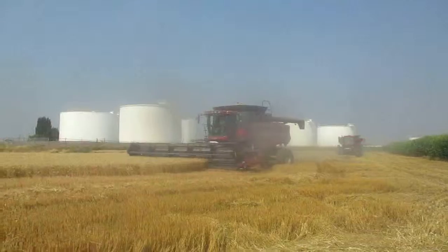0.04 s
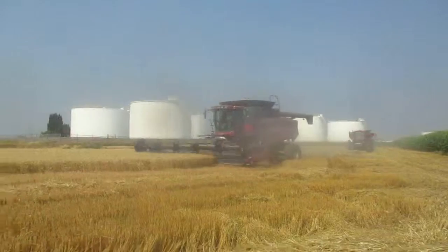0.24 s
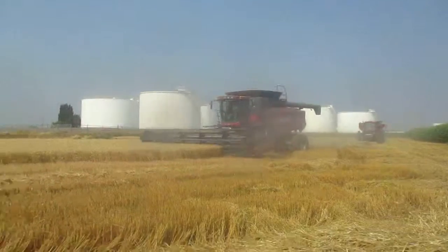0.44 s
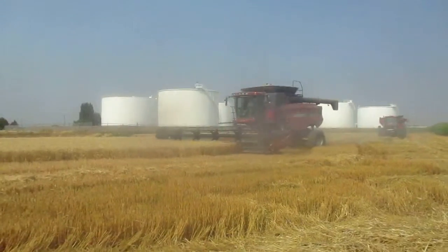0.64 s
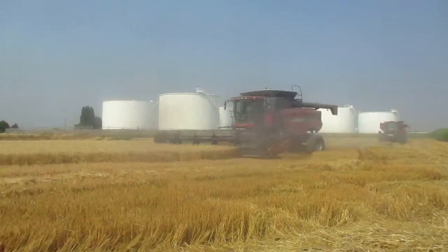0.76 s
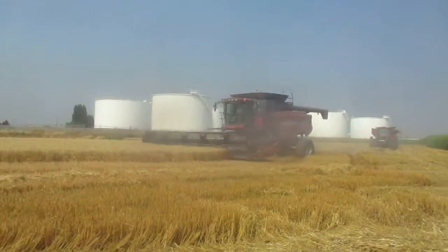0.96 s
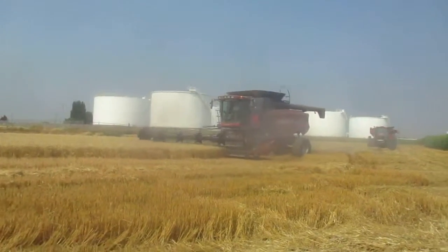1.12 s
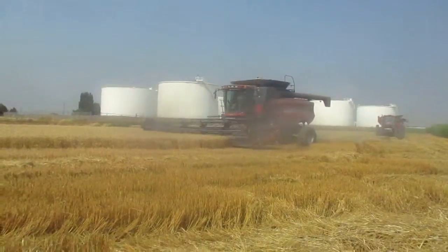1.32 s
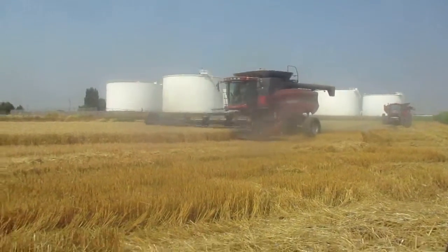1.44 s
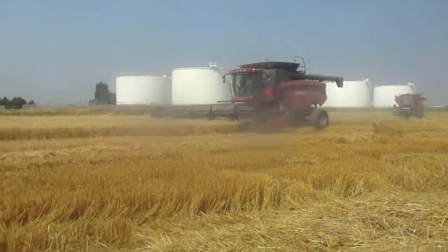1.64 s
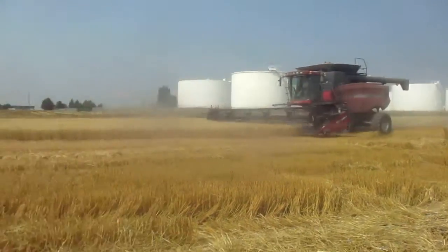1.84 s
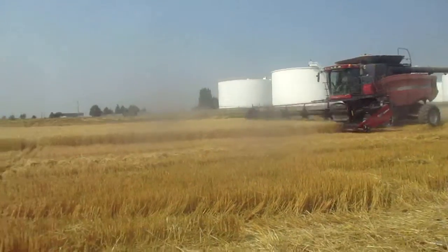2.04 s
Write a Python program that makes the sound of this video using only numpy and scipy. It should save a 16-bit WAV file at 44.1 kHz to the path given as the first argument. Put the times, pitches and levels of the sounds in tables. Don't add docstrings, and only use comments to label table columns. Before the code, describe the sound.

After 0.2 s of silence, a combine harvester's roar cuts in abruptly: low uneven diesel drone, broad threshing rush and faint wavering gear whine. Dry straw rustles close by until about 0.55 s, with sparse ticks and soft chain knocks later. Wind thumps near 0.77 s and 1.3 s, then buffets heavily from 1.6 to 1.9 s as the machine dips and changes tone, swelling again by 2.08 s.

```python
import sys
import numpy as np
from scipy import signal
from scipy.io import wavfile
from scipy.ndimage import uniform_filter1d, map_coordinates

SR = 44100
rng = np.random.default_rng(int(sys.argv[2]) if len(sys.argv) > 2 else 0)


def ratio_of_db(decibels):
    return 10 ** (np.asarray(decibels, float) / 20)


def store_wav(level_fs):
    pcm = np.round(np.clip(np.atleast_2d(level_fs), -1, 1) * 32767)
    wavfile.write(sys.argv[1], SR, pcm.T.astype(np.int16))


N = 91772
t = np.arange(N) / SR

# centre in Hz, width in Hz, level in dB.
EXHAUST_MODES = [(106.1, 25, -8), (207, 50, -30), (496, 180, -23.5), (720, 270, -23)]
# frequency in Hz, density in dB per Hz.
ROAR_SPECTRUM = [(30, -18.5), (100, 1.5), (400, -9), (750, -11.5), (1500, -19), (4000, -22.5),
                 (9000, -37.5), (15500, -108)]
# centre in Hz, width in Hz, level in dB.
HOUSING_MODES = [(714, 470, 10.5), (2010, 280, -2)]
# frequency in Hz, rms level in dB, share of roughness in dB.
GEAR_WHINES = [(2021, -36.5, -4), (2165, -46, -2), (867, -40, 0), (523, -42, 1), (1732, -52, 0),
               (2595, -56, 0), (4038, -59, 0)]
# time in seconds, whine level in dB.
GEAR_LOAD = [(.2, -7), (.3, 4), (.54, -14.5), (.6, 5.5), (.73, -0.5), (.87, 2), (1.2, -0.5), (1.7, 1.5),
             (1.78, -2), (2.08, -2.5)]
# time in seconds, level in dB.
MACHINE_LEVEL = [(.2, -26.5), (.32, -26), (.36, -21), (.74, -21), (.9, -21.5), (1.25, -20), (1.3, -19.5),
                 (1.73, -20.5), (1.78, -24.5), (1.9, -26.5), (2.0, -26), (2.08, -21)]
# time in seconds, level in dB.
GUSTS = [(.2, -29), (.3, -27), (.78, -20.5), (.82, -26.5), (1.25, -25.5), (1.6, -21.5), (1.8, -17.5),
         (1.88, -22), (1.89, -28), (1.96, -27), (1.98, -28), (2.0, -25), (2.05, -24.5), (2.08, -24)]
# time in seconds, peak in dB, frequency in Hz.
THUMPS = [(.298, -8, 130), (.761, -10, 80), (.77, -3, 100), (.781, -4, 110), (.848, -6, 155),
          (1.028, -10, 160), (1.302, -11, 200), (1.351, -11, 150), (1.375, -11, 190), (1.587, -10, 120),
          (1.606, -6, 150), (1.629, -7, 200), (1.696, -8, 260), (1.708, -10, 140), (1.731, -1, 233),
          (1.751, -1, 262), (1.77, -8, 227), (1.781, -4, 153), (1.791, -3, 195), (1.849, -11, 180),
          (1.859, -10, 230), (1.867, -5, 181), (1.877, -3, 232), (1.93, -7, 187), (1.972, -11, 260),
          (1.981, -4, 200), (1.991, -11, 223), (2.059, -11, 300), (2.065, -7, 290), (2.077, -11, 254)]
# time in seconds, level in dB.
RUSTLE_LEVEL = [(.2, -43.5), (.34, -38.5), (.5, -37), (.535, -46), (.56, -65), (.9, -48), (1.0, -96.5)]
# centre in Hz, width in Hz, level in dB.
STALK_MODES = [(8700, 2500, -5), (10600, 900, 0), (13300, 1500, -4)]
# time in seconds, peak in dB, length in ms.
STRAW_TICKS = [
    (.317, -42, 8),
    (.403, -36, 18),
    (.497, -38, 16),
    (.52, -41, 10),
    (.667, -33, 12),
    (.985, -49, 8),
    (1.518, -45, 2),
    (1.532, -34, 2.5),
    (1.685, -48, 6),
    (2.021, -43, 3),
]
# time in seconds, peak in dB, centre in Hz, length in ms.
KNOCKS = [
    (.398, -13, 3300, 12),
    (.52, -11, 4300, 10),
    (.667, -10, 3400, 12),
    (.985, -17, 3300, 10),
    (1.14, -14, 5000, 8),
    (1.607, -9, 2900, 9),
    (1.69, -18, 4000, 8),
]
# time in seconds, height in m, ground reflection factor.
MIC_HEIGHT = [(.2, 1.62, .6), (.75, 1.55, .6), (1.3, 1.45, .6), (1.72, 1.4, .6), (1.77, .93, -.65),
              (1.88, .78, -.65), (1.95, .55, -.75), (2.0, .39, -.85), (2.08, .27, -.85)]


def level(x, db):
    return x * ratio_of_db(db) / np.sqrt(np.mean(x ** 2))


def curve(rows, column=1):
    rows = np.array(rows, float)
    return np.interp(t, rows[:, 0], rows[:, column])


def noise():
    return rng.standard_normal(N)


def band(x, hz, width):
    return signal.lfilter(*signal.iirpeak(hz, hz / width, fs=SR), x)


def body(x, modes):
    out = 0
    for k, (hz, width, db) in enumerate(modes):
        out = out + (-1) ** k * ratio_of_db(db) * level(band(x, hz, width), 0)
    return out


def walk(rate):
    hold = int(SR / rate)
    steps = np.repeat(rng.standard_normal(N // hold + 1), hold)
    drift = uniform_filter1d(uniform_filter1d(steps, hold), hold)[:N]
    return (drift - drift.mean()) / drift.std()


def bump(s, ms):
    return np.exp(-((t - s) / (ms / 2000)) ** 2)


def diesel():
    firing_hz = 103.8 * (1 + 0.0049 * walk(7.6))
    count = np.floor(np.cumsum(firing_hz) / SR).astype(int)
    strength = ratio_of_db(2.0 * rng.standard_normal(400))
    pulses = np.diff(count, prepend=0) * strength[count]
    return level(body(pulses, EXHAUST_MODES), -19)


def threshing():
    roar_hz, roar_db = np.array(ROAR_SPECTRUM).T
    shared = walk(9.56)
    knife = np.sin(2 * np.pi * 7.2 * t + 1.2 * walk(2))
    roar = 0
    for hz in 35 * 2 ** np.arange(0, 9, .5):
        db = np.interp(np.log(hz), np.log(roar_hz), roar_db) + 10 * np.log10(hz)
        db = db + 0.24 * shared + 1.0 * walk(13.68)
        db = db + 1 * min(hz / 3000, 1) * knife
        hiss = band(band(noise(), hz, hz * 0.51), hz, hz * 0.51)
        roar = roar + ratio_of_db(db) * level(hiss, 0)
    housing = level(body(noise(), HOUSING_MODES), -26.5) * ratio_of_db(1.04 * walk(8.5))
    return level(roar, -22) + housing


def gears():
    out = 0
    for hz, db, rough_db in GEAR_WHINES:
        turns = np.cumsum(hz * (1 + 0.001536 * walk(5))) / SR
        tone = np.sqrt(2) * ratio_of_db(2.7 * walk(24.68)) * np.sin(2 * np.pi * turns)
        rough = level(band(band(noise(), hz, hz * 0.021), hz, hz * .05), rough_db)
        out = out + ratio_of_db(db) * (tone + rough)
    return out * ratio_of_db(curve(GEAR_LOAD))


def wind():
    wind_hz, width_hz = 227, 164
    flutter = band(band(noise(), wind_hz, width_hz), wind_hz, 2 * width_hz)
    flutter = level(flutter * ratio_of_db(1.5 * walk(30.46)), 0)
    rumble = level(band(noise(), 57.9, 60) * ratio_of_db(2.5 * walk(14)), -5)
    thumps = 0
    for s, db, hz in THUMPS:
        lean = rng.uniform(0, 2 * np.pi / 3)
        swing = np.cos(2 * np.pi * hz * (t - s) + lean)
        thumps = thumps + ratio_of_db(db) * bump(s, 2000 * 0.5 / hz) * swing
    return ratio_of_db(curve(GUSTS)) * (flutter + rumble) + 1.1 * thumps


def straw():
    rustle = ratio_of_db(curve(RUSTLE_LEVEL) + 2.0 * walk(79.4))
    dry_noise = noise()
    stalks = 0
    for hz, width, db in STALK_MODES:
        stalks = stalks + ratio_of_db(db) * level(band(band(dry_noise, hz, width), hz, width), 0)
    stalks = level(stalks, 0)
    ticks = sum(ratio_of_db(db) * bump(s, ms) for s, db, ms in STRAW_TICKS)
    broad = level(band(noise(), 8660, 3100), 0)
    return rustle * broad + (ratio_of_db(-8.5) * rustle + ticks) * stalks


def clatter():
    knocks = 0
    for s, db, hz, ms in KNOCKS:
        metal = level(band(band(noise(), hz, hz), hz, hz * .7), 0)
        knocks = knocks + ratio_of_db(db) * bump(s, ms) * metal
    return ratio_of_db(3.5 * walk(900)) * knocks / 2


def over_ground(x, source_m):
    distance_m, sound_speed = 20, 343
    height = curve(MIC_HEIGHT)
    delay_s = 2 * height * source_m / distance_m / sound_speed
    mirror = map_coordinates(x, [(t - delay_s) * SR], mode="mirror")
    dull = signal.sosfiltfilt(signal.butter(1, 5000, fs=SR, output="sos"), mirror)
    bounce = mirror + (dull - mirror) * height / height[0]
    return x + curve(MIC_HEIGHT, column=2) * bounce


def scene():
    rotor = over_ground(threshing() + clatter(), 2.27)
    deck = over_ground(ratio_of_db(6) * threshing() + diesel(), 3.2)
    near_db = curve(MACHINE_LEVEL)
    turning = ratio_of_db(near_db - np.median(near_db))
    machine = (ratio_of_db(-8) * (rotor + deck) + gears()) * turning
    return (machine + wind() + straw())[None]


def top_cut(x):
    return signal.sosfilt(signal.butter(12, 15650, fs=SR, output="sos"), x)


def record(dry):
    x = signal.sosfilt(signal.butter(2, 26, "high", fs=SR, output="sos"), dry)
    x = x * (t > .2066)
    x = signal.sosfilt(signal.butter(2, 13700, fs=SR, output="sos"), x)
    x = x / (1 + np.abs(x) ** 6) ** (1 / 6)
    return top_cut(x)


dry = scene()
out = record(dry)
store_wav(out)
```